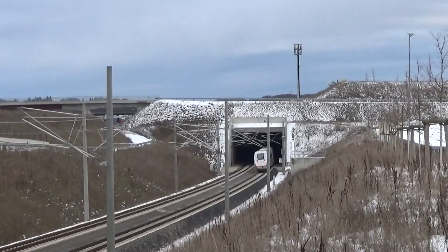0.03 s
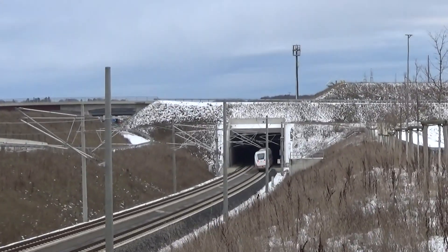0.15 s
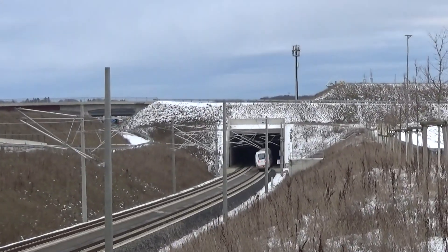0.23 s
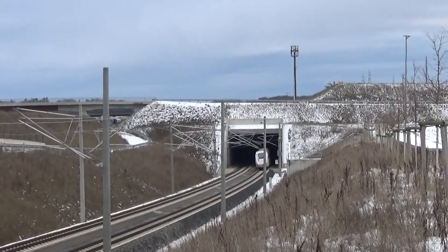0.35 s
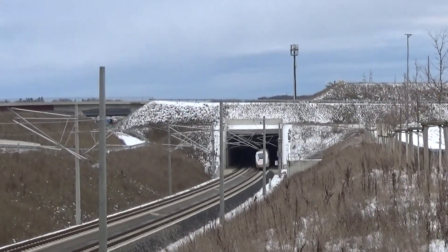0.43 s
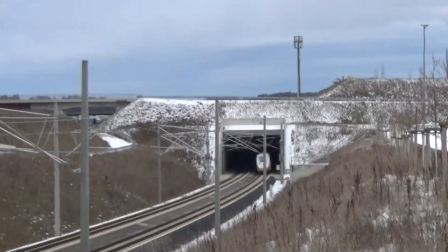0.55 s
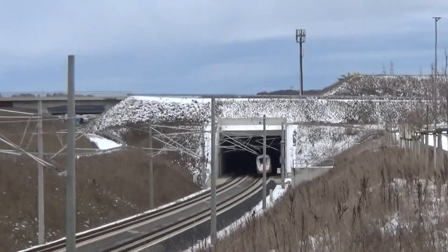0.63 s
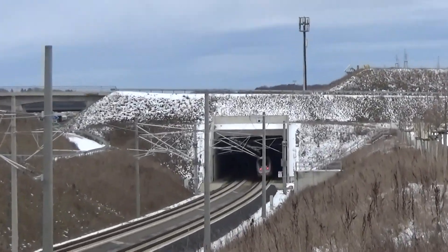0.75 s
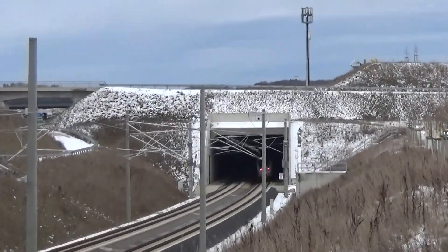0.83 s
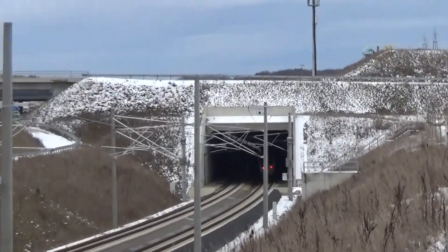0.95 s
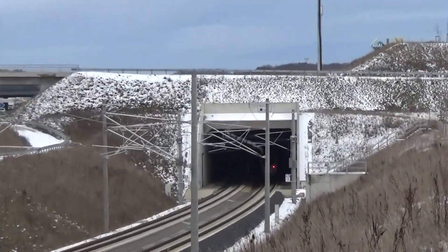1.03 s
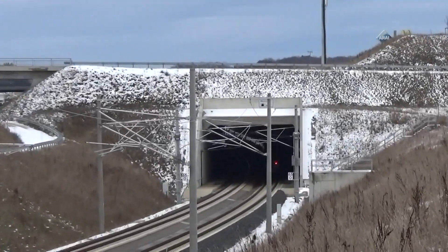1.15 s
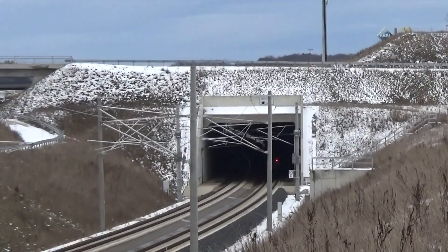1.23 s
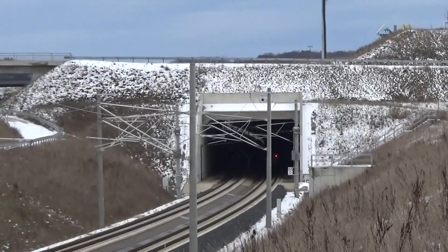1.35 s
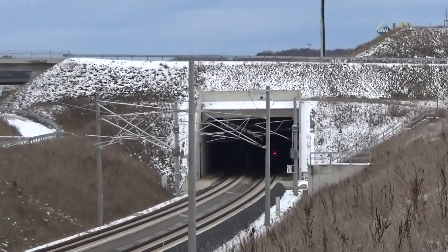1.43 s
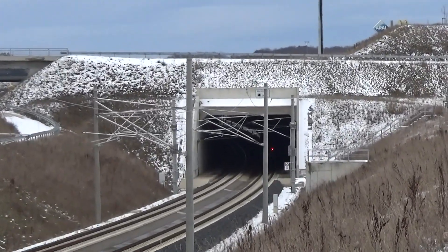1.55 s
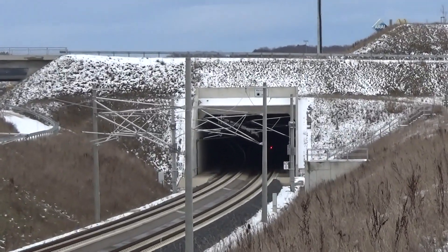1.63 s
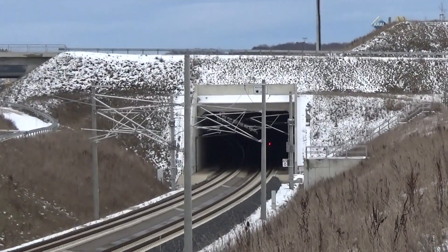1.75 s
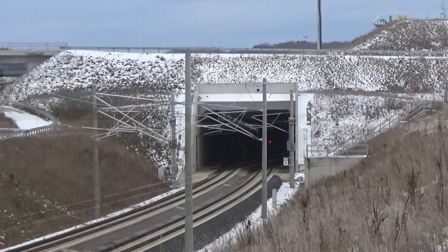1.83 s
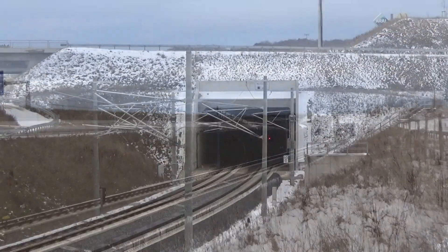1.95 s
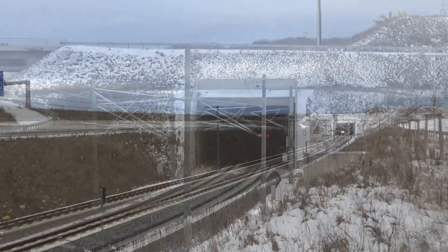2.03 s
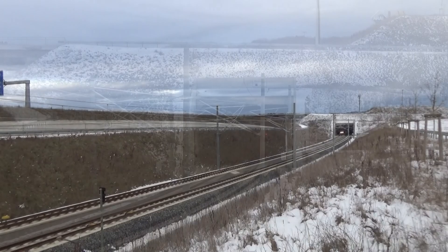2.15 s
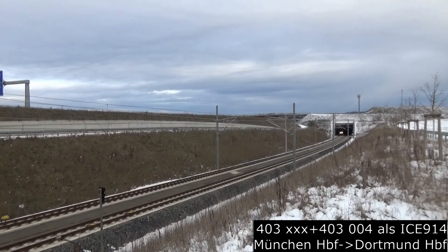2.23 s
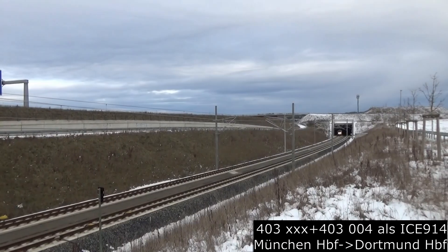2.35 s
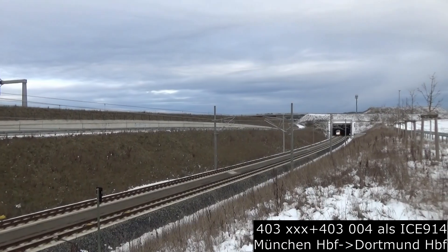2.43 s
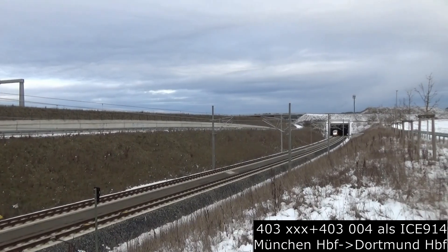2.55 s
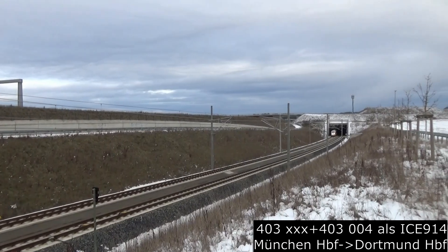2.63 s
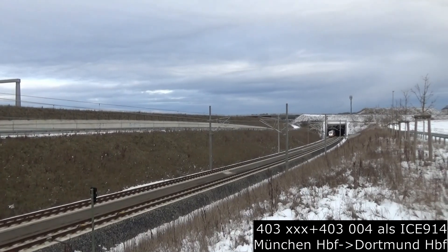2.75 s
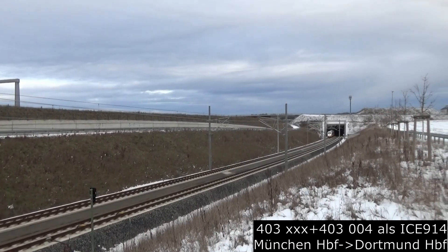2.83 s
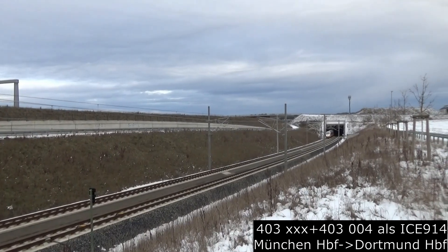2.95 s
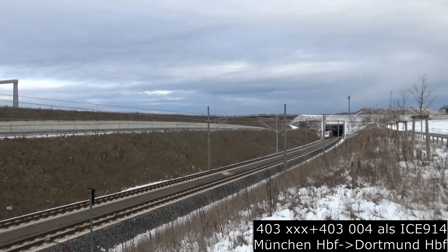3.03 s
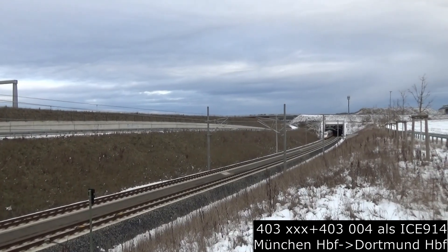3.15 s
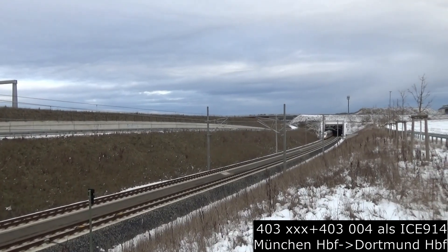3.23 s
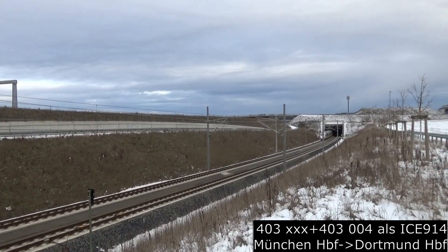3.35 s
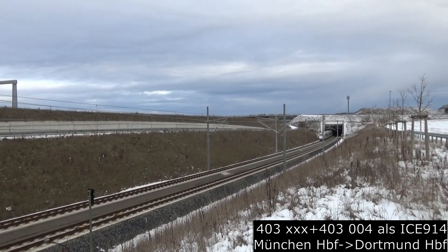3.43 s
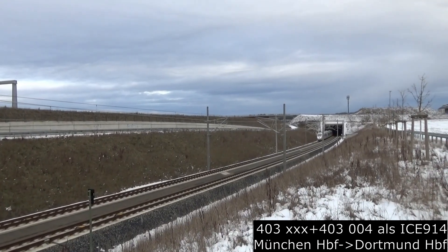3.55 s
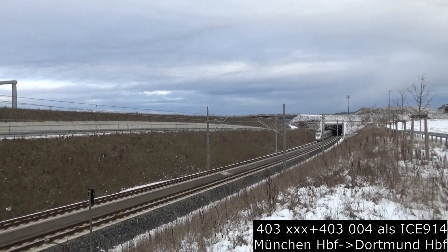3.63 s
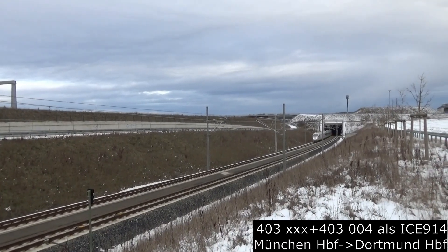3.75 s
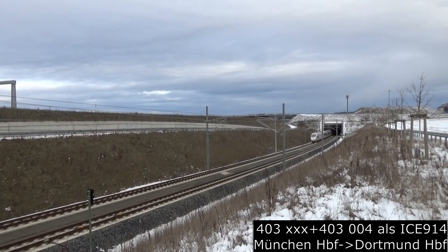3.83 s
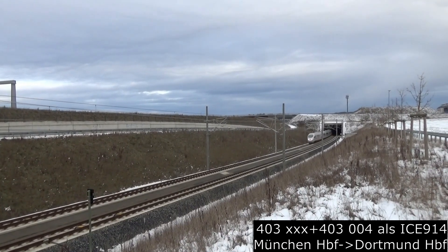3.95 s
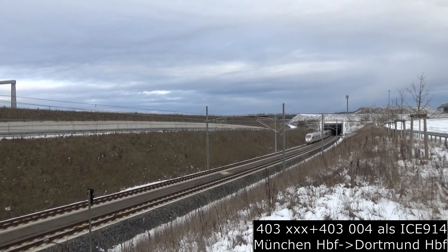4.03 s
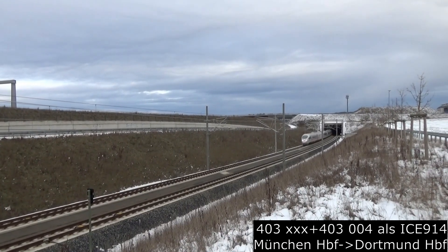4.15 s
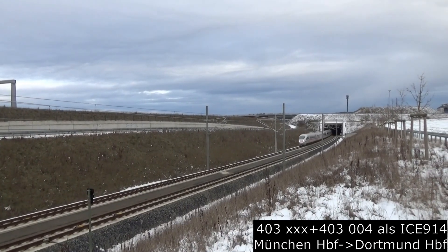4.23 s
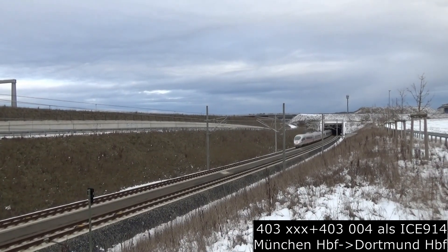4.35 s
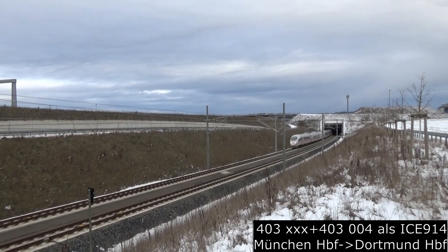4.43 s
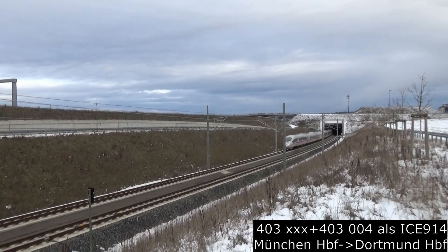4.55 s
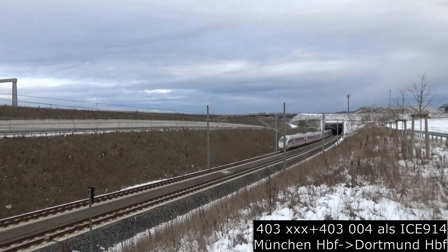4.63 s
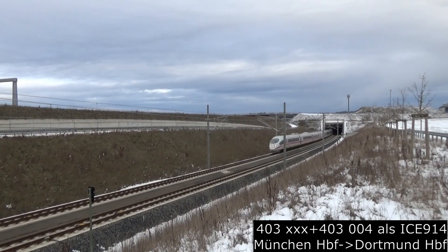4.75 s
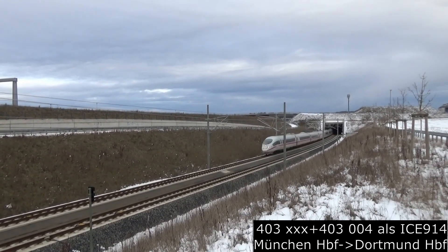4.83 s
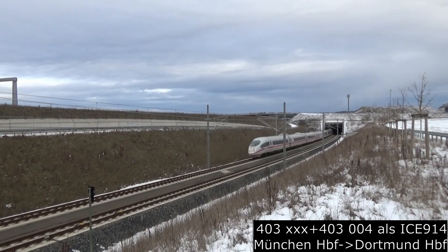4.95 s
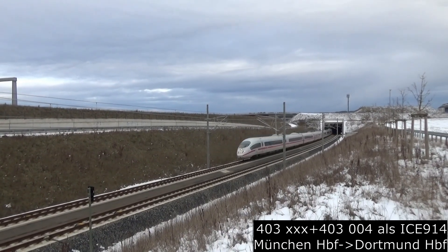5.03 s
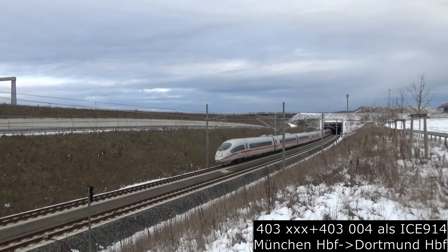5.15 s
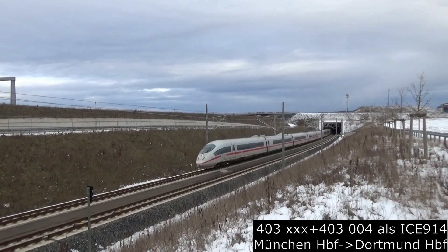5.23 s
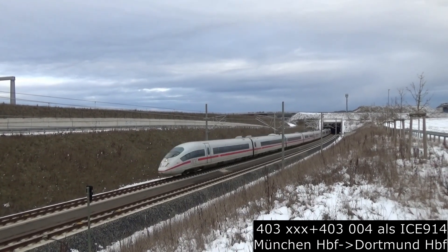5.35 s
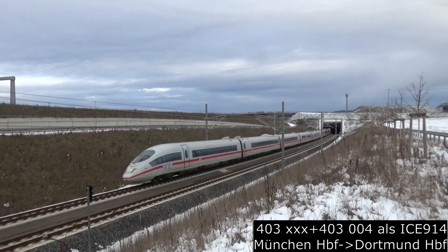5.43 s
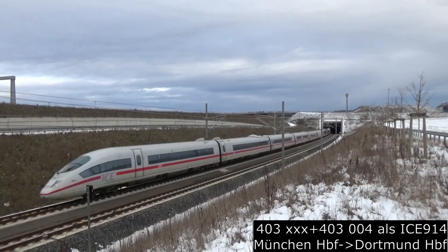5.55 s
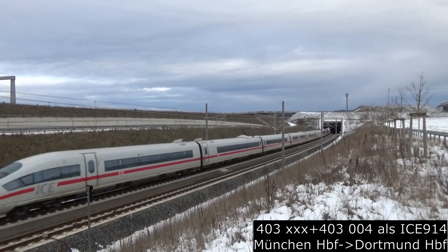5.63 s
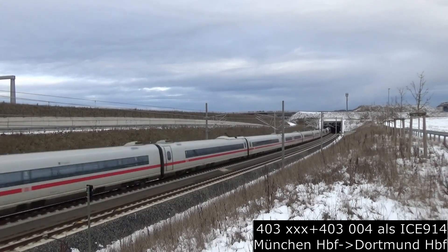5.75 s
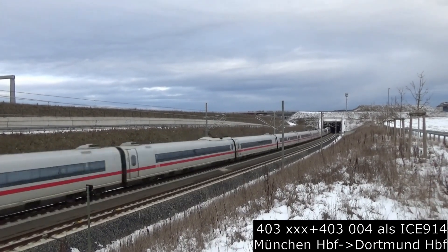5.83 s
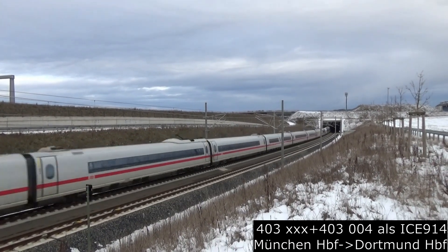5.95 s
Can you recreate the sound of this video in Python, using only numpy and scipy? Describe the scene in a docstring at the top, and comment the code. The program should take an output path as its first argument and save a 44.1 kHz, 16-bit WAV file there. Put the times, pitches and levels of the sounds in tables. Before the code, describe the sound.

Steady far-off traffic and a low tunnel thrum are heard from the trackside, with a few small ticks close to the microphone. Thin, high hissing and whining pulses along the rails, growing as a fast train approaches. Its uneven rumble builds into a loud roar of wheels and rushing air. Right at the end the front sweeps by with a dropping howl and whoosh, and the sound swings from the centre to the left.

```python
"""Open country beside a high-speed line, with a motorway droning in the distance. At the first spot a
train fades into a tunnel, which thrums and sounds a hollow note. From a second spot, about 15 m off the
track, another is heard coming out: the rails hiss and whine ahead of it, its rumble swells, then wheels
roar, the leading car howls and air rushes by in gusts, head-on at first and then on the left.
Something small ticks near the microphone."""
import sys
import numpy as np
from scipy import signal
from scipy.fft import rfft, irfft, next_fast_len
from scipy.io import wavfile
from scipy.ndimage import uniform_filter1d

SR = 44100
rng = np.random.default_rng(int(sys.argv[2]) if len(sys.argv) > 2 else 0)


def to_wav(sig):
    """Store sig (one row per channel, or 1-D mono) as 16-bit WAV at the path in sys.argv[1].

    Samples outside -1..1 are clipped; the rate is SR.
    """
    pcm = np.clip(np.atleast_2d(sig), -1, 1) * 32767
    pcm = np.round(pcm).astype(np.int16)
    wavfile.write(sys.argv[1], SR, pcm.T)  # frames by channels


N = 264159
TIME_S = np.arange(N) / SR


def undb(db):
    """Gain of a level in dB."""
    return 10 ** (np.asarray(db) / 20)

def curve(table, fall_db=0.):
    """Columns over time; ahead of the first row the first column falls off by fall_db a second."""
    s, *columns = np.transpose(table)
    columns = [np.interp(TIME_S, s, c) for c in columns]
    columns[0] -= fall_db * np.clip(s[0] - TIME_S, 0, None)
    return columns

def lifts(table, edge_s):
    """Each row lifts its columns for a while, with straight edges; overlaps add up."""
    start, length, *columns = np.transpose(table)
    t = TIME_S[:, None]
    on = np.clip(np.minimum(t - start, start + length - t) / edge_s + .5, 0, 1)
    return [on @ c for c in columns]

def on_log(hz, table):
    """Reads (Hz, value) points on a log-frequency axis."""
    points_hz, values = np.transpose(table)
    return np.interp(np.log(hz), np.log(points_hz), values)

def walk(rate):
    """Random levels held 1 / rate s and smoothed twice; spread near 1."""
    hold = int(SR / rate)
    steps = np.repeat(rng.standard_normal(N // hold + 1), hold)
    return 1.3 * uniform_filter1d(uniform_filter1d(steps, hold), hold)[:N]

def place(x, db, pan_db):
    """Sets level and left-minus-right balance."""
    return x * undb(db + np.array([[1], [-1]]) * pan_db / 2)

def tone(hz, width_hz, steady=0):
    """A tone with the share steady of its power pure and the rest smeared over width_hz."""
    carrier = np.exp(2j * np.pi * (np.cumsum(hz * np.ones(N)) / SR + rng.random()))
    smear = rng.standard_normal(N) + 1j * rng.standard_normal(N)
    smear = signal.sosfilt(signal.butter(2, width_hz / 2, fs=SR, output="sos"), smear)
    smear /= np.sqrt(np.mean(np.abs(smear) ** 2))
    return np.sqrt(2) * np.real(carrier * (np.sqrt(steady) + np.sqrt(1 - steady) * smear))

# Stereo width. Each row: frequency in Hz, relative level of the left-right difference in dB.
STEREO_WIDTH = [(45, -32), (100, -27), (200, -21), (400, -19), (600, -20.5), (1000, -92), (2500, -30),
                (5000, -33), (10000, -14), (12000, -43)]
# The housing shades the microphone's far port. Each row: frequency in Hz, share of the lean.
PORT_SHADE = [(60, -0.49), (110, 0.11), (190, 0.51), (280, 0.19), (400, 1.52), (570, 0.25), (800, 0.47),
              (1150, 0.34), (1700, 0.18), (3000, 0.23), (6000, 0.27), (12000, -0.096)]

def noise(colour, flicker_db, rate, dull_db=0., lean_db=0.):
    """Stereo noise, rms 1, in flickering bands; dulled per octave, widened as it leans (left is +)."""
    size = next_fast_len(N)
    hz = np.arange(1, size // 2 + 2) * SR / size
    lo, hi = colour[0][0], colour[-1][0]
    pair = rfft(rng.standard_normal((2, size))) * undb(on_log(hz, colour)) * ((hz > lo) & (hz < hi))
    pair[1] *= undb(on_log(hz, STEREO_WIDTH))
    out = 0
    for octave in np.arange(np.log2(lo), np.log2(hi) + .5, .5):
        band = np.clip(1 - 2 * np.abs(np.log2(hz) - octave), 0, 1)
        mid, side = irfft(band * pair, size)[:, :N]
        side = side * (0.61 + np.abs(lean_db) / 5)
        db = flicker_db * walk(rate) - dull_db * (octave - np.log2(lo * hi) / 2)
        pan_db = lean_db * on_log(2 ** octave, PORT_SHADE)
        out = out + place(np.array([mid + side, mid - side]), db, pan_db)
    return out / np.sqrt(np.mean(out ** 2))


# The motorway from the first spot. Each row: time in seconds, level in dB, leftward lean in dB.
FIRST_DRONE = [(0, -39.5, 5), (1.8, -40, 9), (2.2, -39, -1.5)]
# From the second. Each row: time in seconds, level in dB, dullness in dB per octave, lean in dB.
SECOND_DRONE = [(1.9, -43.5, 3, 14), (2.2, -35.5, 2, 4), (2.45, -36, 1.5, 3), (3, -36, 1, 5.5),
                (3.5, -37.5, 0.5, 2.5), (4.4, -39, 2, 4)]
# Its spectrum at each spot. Each row: frequency in Hz, relative level in dB.
FIRST_SPECTRUM = [(71, -19), (120, -6), (209, 1.5), (259, -3.5), (377, -6), (410, -5.5), (475, -10),
                  (541, -10), (726, -5), (1040, -7), (1700, -11), (4120, -35.5), (6000, -50), (7800, -53),
                  (13200, -120)]
SECOND_SPECTRUM = [(71, -57), (120, -7.5), (213, -9), (290, -10.5), (490, -17.5), (568, -14.5),
                   (1080, -10.5), (1330, -14.5), (1540, -16), (1670, -17), (2870, -28), (4320, -41),
                   (6000, -53), (7800, -82), (13200, -120)]

def motorway(second_share):
    """Distant tyres and engines from two spots in turn; a faint high tone hangs over the first."""
    db, lean_db = curve(FIRST_DRONE)
    first = undb(db) * noise(FIRST_SPECTRUM, flicker_db=0.47, rate=4.03, lean_db=lean_db)
    first += undb(-81) * tone(15620, width_hz=20, steady=.5)
    db, dull_db, lean_db = curve(SECOND_DRONE)
    second = undb(db) * noise(SECOND_SPECTRUM, 0.28, 5.37, dull_db, lean_db)
    return (1 - second_share) * first + second_share * second


# The microphone's noise floor. Each row: frequency in Hz, relative level in dB.
FLOOR_SPECTRUM = [(3500, -41), (5000, 1), (7000, 2.5), (9300, 4.5), (14300, 2.5), (15750, -2)]

def microphone_hiss(second_share):
    """The microphone's own faint hiss at either spot."""
    first, second = [noise(FLOOR_SPECTRUM, flicker_db=0.31, rate=4) for spot in range(2)]
    return undb(-68) * ((1 - second_share) * first + second_share * second)


# Thrum in ground and tunnel. Each row: time in seconds, level in dB.
THRUM = [(0, -35.5), (.4, -43.5), (1.3, -39), (2, -40), (2.5, -37), (3.5, -37.5), (3.66, -32.5),
         (4.2, -34.5), (4.45, -27.5), (5.3, -27.5), (5.99, -30.5)]
# Its spectrum. Each row: frequency in Hz, relative level in dB.
THRUM_SPECTRUM = [(13, -43), (22, -20.5), (65, -1), (140, -3.5), (180, -15), (310, -120)]
# The note of the tunnel mouth. Each row: time in seconds, level in dB, centre in Hz.
MOUTH_NOTE = [(0, -60, 745), (.5, -49.5, 743.2), (1.12, -50, 739), (1.28, -44, 735), (1.6, -47, 728.4),
              (1.76, -40.5, 739.5), (1.92, -51, 715.5), (2.5, -50.5, 699), (4.2, -49, 701),
              (4.38, -43.5, 705), (4.6, -43.5, 700), (5.1, -36.5, 700), (5.5, -51, 685)]

def tunnel():
    """The ground thrums and the mouth's hollow note swells now and then."""
    (thrum_db,) = curve(THRUM)
    thrum = undb(thrum_db) * noise(THRUM_SPECTRUM, flicker_db=0.16, rate=9.9, lean_db=2.1)
    note_db, hz = curve(MOUTH_NOTE)
    return thrum + place(tone(hz, width_hz=132), note_db, pan_db=0.2)


# The rails between surges. Each row: time in seconds, then lower hiss, upper hiss, tones, whine in dB.
RAIL_LEVELS = [(0, -64, -65, -69.5, -95), (1.3, -71, -67, -77, -95), (2.04, -78, -72, -82, -88),
               (2.11, -74, -64, -79, -71), (3.15, -65.5, -60, -75, -61), (4.3, -56, -49.5, -63.5, -56.5),
               (4.95, -54, -58.5, -58, -48), (5.45, -59, -52, -61, -60.5), (5.99, -56, -54, -55, -62)]
# Surges. Each row: start and length in seconds, then lifts of lower hiss, upper hiss, whine in dB.
RAIL_SURGES = [(.07, .08, 3, 5, 0), (.2, .18, 0, 4, 0), (.55, .17, 6, 4, 0), (.88, .07, 5, 3, 0),
               (1.03, 0.17, 6, 3, 0), (1.56, .13, 8, 5, 0), (2.24, .08, 1, -6, 7), (2.53, .13, 8, 1, 4),
               (2.77, .13, 2, -2, 4), (2.96, .14, 7, 9, 5.5), (3.22, 0.064, 7, 6, 1), (3.34, .1, 8, 7, 4),
               (3.52, .14, 6, 2, 5), (3.76, .13, 5, 4, 5), (3.97, 0.17, 9, 8, 7), (4.17, .05, 10, -3, 0),
               (4.33, 0.12, 5, 1, 7), (4.49, 0.23, 9, 10, 8), (4.73, 0.099, 10, 14, 8),
               (5.13, .15, 10, 13, 10), (5.34, .06, -11, 9, 1), (5.73, .04, 2, 5, 0)]
# The two bands of hiss. Each row: frequency in Hz, relative level in dB.
LOWER_SPECTRUM = [(10100, -2), (10350, -13), (10550, 1.5), (11000, 2), (11500, -0.5), (11750, 1),
                  (12000, -12)]
UPPER_SPECTRUM = [(11980, -24), (12200, -1), (13000, -6), (13450, -3.5), (13700, 3), (13850, -2),
                  (14050, -16), (15700, -20)]
# Three thin tones. Each entry: centre in Hz.
THIN_HZ = [9775, 12232, 6250]
# Their shapes. Each row: width in Hz, relative level in dB.
THIN_SHAPES = [(100, 1.5), (35, 0), (90, -9.5)]
# The whine's sinking base pitch. Each row: time in seconds, frequency in Hz.
WHINE_BASE = [(2.1, 1061), (3, 1060), (4.05, 1057.7), (4.65, 1055.5), (4.95, 1052.8), (5.55, 1049),
              (5.99, 1047.5)]
# Its partials. Each row: multiple of the base, relative level in dB.
WHINE_PARTIALS = [(9, -24), (10, -6.5), (11, -10), (12, -3), (13, 0), (14, -20)]

def rails():
    """The rails sing while the train is still far off: surging hiss and whine, and thin tones."""
    lower_db, upper_db, tones_db, whine_db = curve(RAIL_LEVELS)
    lower_lift, upper_lift, whine_lift = lifts(RAIL_SURGES, edge_s=0.058)
    flutter = undb(1.4 * walk(40))
    lower = undb(lower_db + lower_lift) * noise(LOWER_SPECTRUM, flicker_db=0.9, rate=30.2, lean_db=8.2)
    upper = undb(upper_db + upper_lift) * noise(UPPER_SPECTRUM, flicker_db=2.1, rate=25, lean_db=2.7)
    tones = sum(undb(db + 2.5 * walk(12)) * tone(hz, width)
                for hz, (width, db) in zip(THIN_HZ, THIN_SHAPES))
    (base_hz,) = curve(WHINE_BASE)
    whine = sum(undb(db + 1.6 * walk(19)) * tone(k * base_hz, width_hz=45, steady=0.59)
                for k, db in WHINE_PARTIALS)
    return flutter * (lower + upper + undb(whine_db + whine_lift) * whine) + undb(tones_db) * tones


# Ticks close to the microphone. Each row: start in seconds, peak in dB, centre in Hz.
NEAR_TICKS = [(1.1069, -40.5, 4500), (1.2201, -50, 4800), (1.2655, -47, 3280), (1.6546, -48.5, 5500),
              (1.7978, -59, 6480), (1.9145, -52, 5480), (1.935, -52, 7000), (2.0178, -49, 4800),
              (2.4173, -30.5, 6200), (2.4274, -49, 6000), (3.259, -60, 6000)]

def ticks(rise_s=0.00032, t60_s=.02):
    """Something small ticks: short cracks of band-passed noise."""
    out, t = np.zeros(N), np.arange(2000) / SR
    envelope = (1 - np.exp(-t / rise_s)) * np.exp(-np.log(1000) * t / t60_s)
    for s, db, hz in NEAR_TICKS:
        band = signal.butter(2, (hz / 2, hz * 1.32), "bandpass", fs=SR, output="sos")
        crack = signal.sosfilt(band, rng.standard_normal(len(t)) * envelope)
        start = int(s * SR)
        out[start:start + len(t)] += undb(db) * crack / np.abs(crack).max()
    return place(out, 0, pan_db=1.0)


# The oncoming train's rumble. Each row: frequency in Hz, relative level in dB.
RUMBLE_SPECTRUM = [(70, -36), (95, -7), (130, -1.5), (200, 0.5), (240, -3), (275, -12), (340, -13),
                   (425, -21), (600, -21), (780, -42)]
# A narrow band of low noise that swells and shifts unevenly within the rumble.
# Each row: time in seconds, level in dB, centre in Hz.
LOW_BAND = [(3.6, -49, 185), (4.0, -49, 150), (4.3, -28, 130.2), (4.42, -34, 150), (4.55, -22.5, 220.6),
            (4.75, -37.5, 189.6), (4.9, -22.5, 198), (5.1, -18.5, 150.7), (5.22, -22.5, 199.7),
            (5.36, -23.5, 177.1), (5.45, -23, 214.6), (5.6, -33, 159.5)]

def rumble(lean_db, peak_s=5, peak_db=-20, rise_db_s=13, fall_db_s=14):
    """An uneven low roar, loudest just before the nose draws level with the microphone."""
    late_s = TIME_S - peak_s
    db = peak_db + np.minimum(rise_db_s * late_s, -fall_db_s * late_s)
    band_db, hz = curve(LOW_BAND, fall_db=25)
    band = place(tone(hz, width_hz=39.4, steady=0.19), band_db, 0.62 * lean_db)
    return undb(db) * noise(RUMBLE_SPECTRUM, flicker_db=0.5, rate=7.3, lean_db=lean_db) + band


SPEED_M_S, TRACK_M, ABREAST_S = 81.7, 14.6, 5.432  # TRACK_M: from microphone to track
AHEAD_M = SPEED_M_S * np.clip(ABREAST_S - TIME_S, 0, None)  # still to run until the nose is abreast

def approach_db(alongside_db, loss_db_m):
    """Level after spreading and loss over ground and air; steady once the train is alongside."""
    spreading_db = 20 * np.log10(np.hypot(AHEAD_M, TRACK_M) / TRACK_M)
    return alongside_db - spreading_db - loss_db_m * AHEAD_M


# Wheels on rail. Each row: frequency in Hz, relative level in dB.
WHEEL_SPECTRUM = [(150, -12), (250, -4.5), (326, -4.5), (426, -16), (643, -4.5), (1250, -8), (1350, -6),
                  (1840, -8), (2430, -9), (4920, -24.5), (6000, -32), (7800, -54), (13200, -120)]

def wheels(lean_db, gust_db):
    """The rolling roar grows as the train closes in."""
    db = approach_db(-23, loss_db_m=0.054) + gust_db
    return undb(db) * noise(WHEEL_SPECTRUM, flicker_db=0.64, rate=13, dull_db=0.5, lean_db=lean_db)


# Air along the train. Each row: frequency in Hz, relative level in dB.
AIR_SPECTRUM = [(1470, -32), (2500, -8), (3810, -6), (4910, -11.5), (6770, -5), (12700, -12), (14100, -23),
                (15600, -18)]

def air_rush(lean_db, gust_db):
    """A smooth rush; distance eats its treble, and gusts make it louder and duller."""
    db = approach_db(-37.5, loss_db_m=0.093) + gust_db
    dull_db = 0.5 + .004 * AHEAD_M + 0.35 * gust_db
    return undb(db) * noise(AIR_SPECTRUM, flicker_db=0.99, rate=40, dull_db=dull_db, lean_db=lean_db)


# Howl and whoosh at close range. Each row: time in seconds, level in dB, centre in Hz.
CAR_HOWL = [(5.25, -48, 1360), (5.42, -33.5, 1350), (5.55, -28.5, 1348), (5.64, -24.5, 1335),
            (5.71, -29, 1306), (5.77, -42, 1254)]
CAR_WHOOSH = [(5.5, -29.5, 1156), (5.62, -26.5, 1098), (5.77, -25.5, 1050), (5.88, -25.5, 778),
              (5.99, -30, 822)]

def leading_car(lean_db):
    """Two close rough tones over a broad whoosh, dropping in pitch as the car goes by."""
    howl_db, hz = curve(CAR_HOWL, fall_db=59)
    howl = tone(hz, 103.3, steady=0.051) + undb(-3) * tone(1.135 * hz, 90.4, steady=0.11)
    whoosh_db, centre_hz = curve(CAR_WHOOSH, fall_db=58)
    whoosh = tone(centre_hz, width_hz=470)
    return place(undb(howl_db) * howl + undb(whoosh_db) * whoosh, 0, 0.065 * lean_db)


# The train comes head-on, then fills the left. Each row: time in seconds, leftward lean in dB.
TRAIN_LEAN = [(3.4, -0.5), (4.4, 0.5), (5.2, 0), (5.55, 0.5), (5.68, 1.5), (5.78, 6), (5.99, 12)]
# Nose and bogies sweep by. Each row: start and length in seconds, lifts of air and of wheels in dB.
PASSING_GUSTS = [(5.16, 0.32, 7, 0.5), (5.26, 0.055, 5.5, -1), (5.33, 0.057, 4.5, 0),
                 (5.44, 0.064, -0.5, 3.5), (5.59, 0.087, 5, .5), (5.92, .04, -0.5, 0)]

def scene():
    """The first spot fades into the second, where the train bears down on the microphone."""
    second_share = np.interp(TIME_S, (1.82, 2.32), (0, 1))
    (lean_db,) = curve(TRAIN_LEAN)
    air_gust_db, wheel_gust_db = lifts(PASSING_GUSTS, edge_s=0.047)
    lineside = motorway(second_share) + microphone_hiss(second_share) + tunnel() + rails() + ticks()
    rolling = rumble(lean_db) + wheels(lean_db, wheel_gust_db)
    return lineside + rolling + air_rush(lean_db, air_gust_db) + leading_car(lean_db)

def record(dry):
    """The recorder rounds the loudest peaks and cuts the top."""
    ceiling, top_hz = 0.46, 15770
    rounded = ceiling * np.tanh(dry / ceiling)
    return signal.sosfilt(signal.ellip(14, .2, 90, top_hz, fs=SR, output="sos"), rounded)


dry = scene()
out = record(dry)
to_wav(out)
```